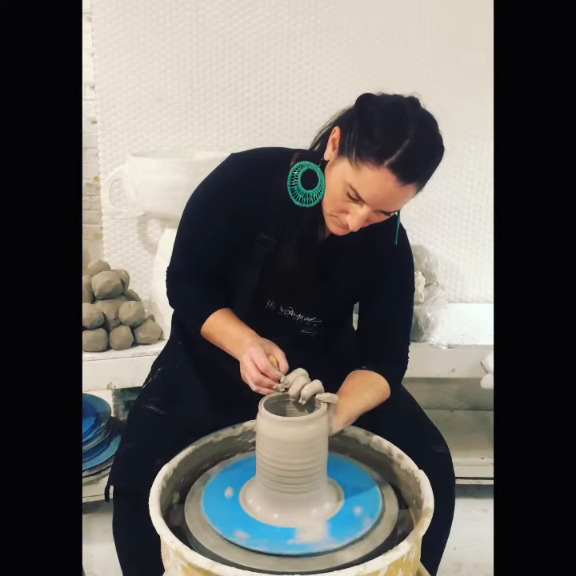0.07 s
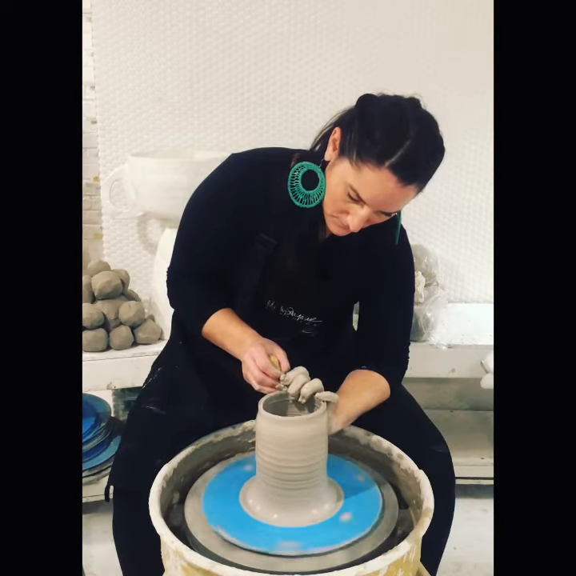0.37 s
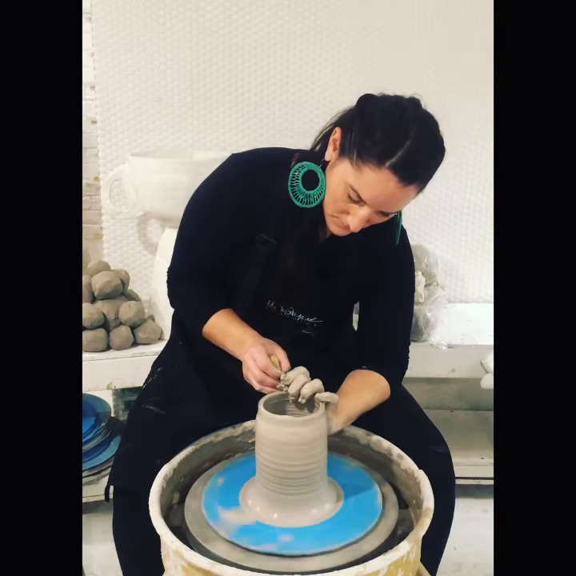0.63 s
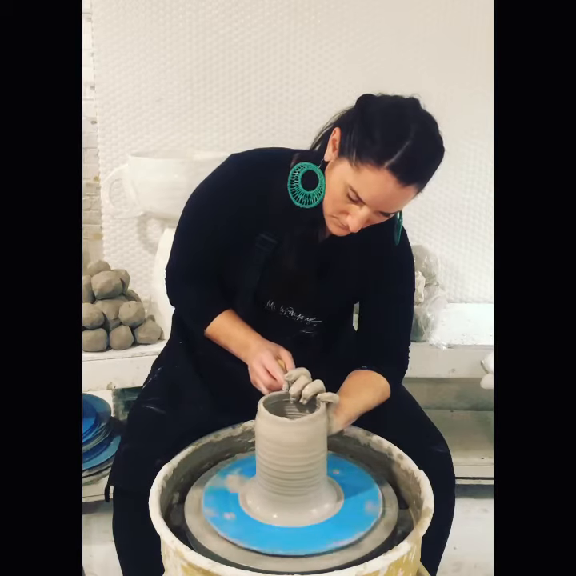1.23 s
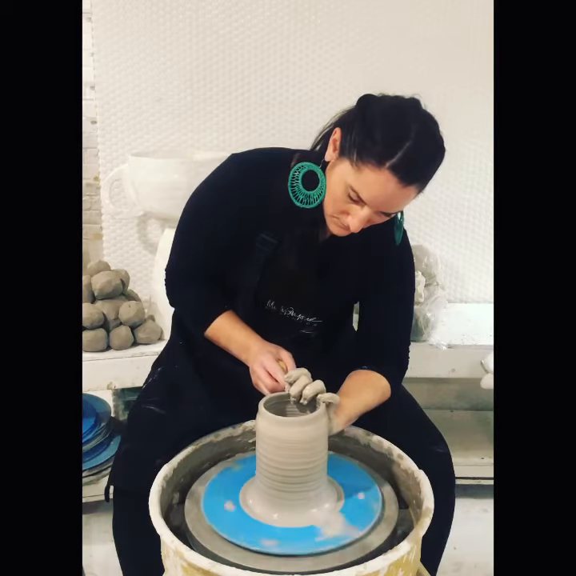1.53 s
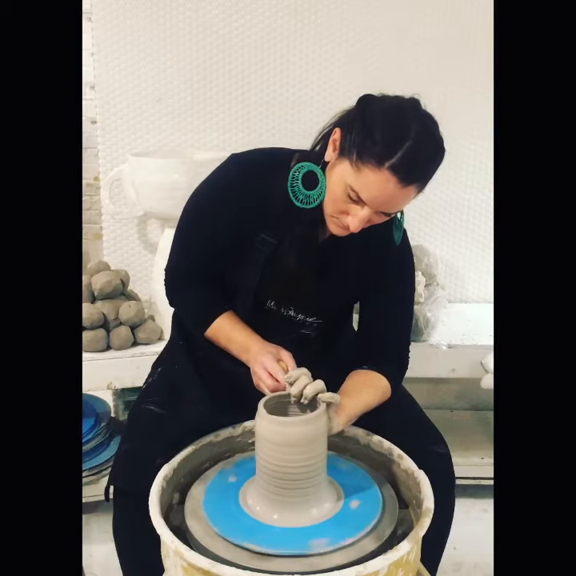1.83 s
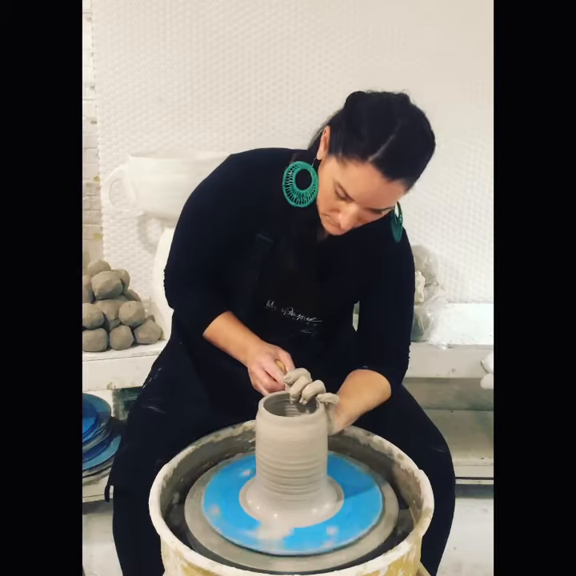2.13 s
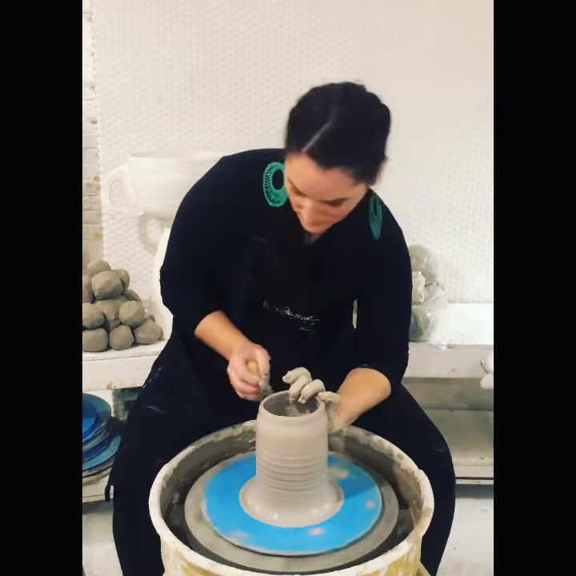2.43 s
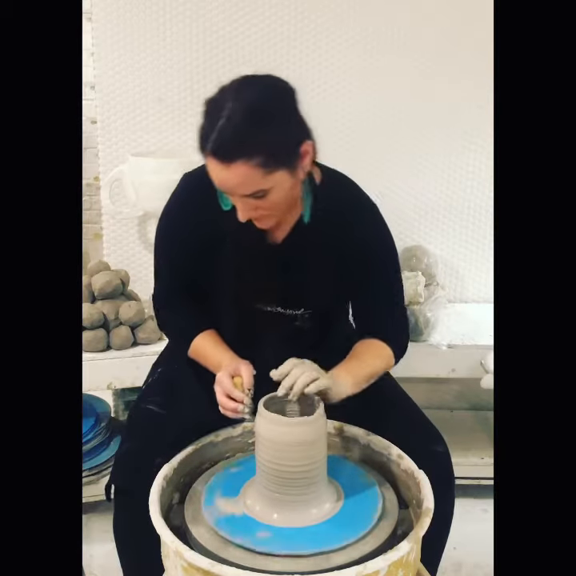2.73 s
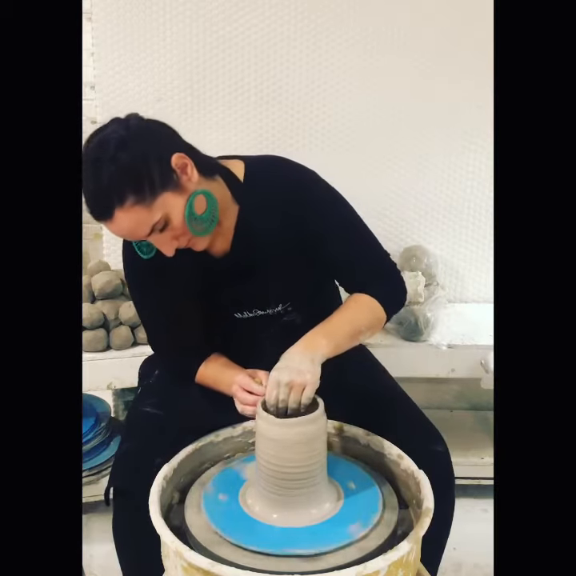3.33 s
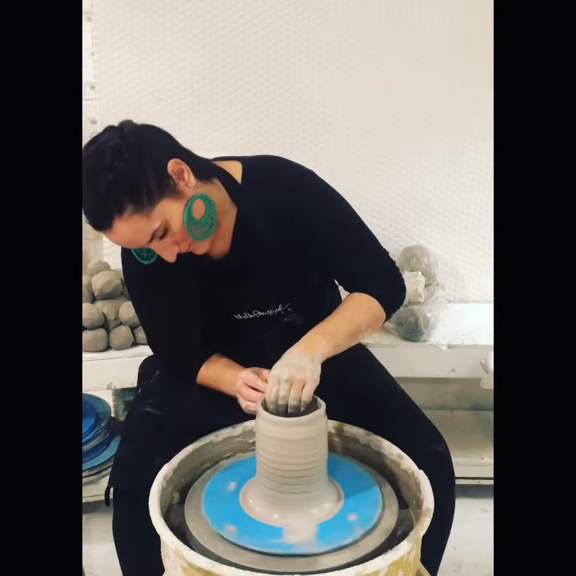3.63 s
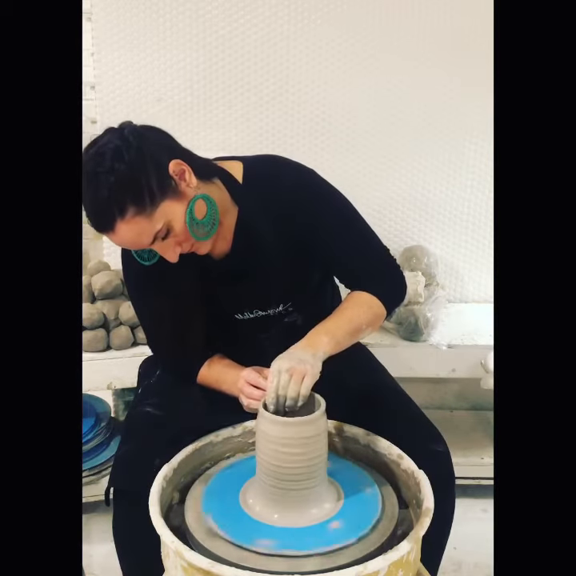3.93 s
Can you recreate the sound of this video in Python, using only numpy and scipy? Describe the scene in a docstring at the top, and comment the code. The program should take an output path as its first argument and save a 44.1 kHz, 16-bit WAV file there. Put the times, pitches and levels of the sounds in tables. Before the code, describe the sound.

An electric pottery wheel hums low and steady for the whole four seconds, with a soft rumble over quiet room hiss. Short, light rubs with a thin ring come irregularly, clearest near 0.1, from 1.5 to 2 and at 3.7 seconds. A faint dry tick sounds at about 0.2, 1.3, 2.3 and 3.4 seconds. Around 2.6 seconds, the motor's weaker tones dip slightly in pitch.

```python
"""Pottery wheel in a small studio

An electric wheel turns steadily while wet clay is shaped on it. Its motor hums at twice the mains
frequency, and its shaft adds weaker tones that sag as the load changes. Over a quiet hiss, the drive
rumbles, rubs now and then against a ringing housing and ticks once per turn of the wheel."""
import sys
import numpy as np
from scipy.fft import rfft, irfft, next_fast_len
from scipy.io import wavfile
from scipy.ndimage import map_coordinates

SR = 44100
rng = np.random.default_rng(int(sys.argv[2]) if len(sys.argv) > 2 else 0)


def to_wav(sig):
    """Store sig (one row per channel, or 1-D mono) as 16-bit WAV at the path in sys.argv[1].

    Samples outside -1..1 are clipped; the rate is SR.
    """
    pcm = np.clip(np.atleast_2d(sig), -1, 1) * 32767
    pcm = np.round(pcm).astype(np.int16)
    wavfile.write(sys.argv[1], SR, pcm.T)  # frames by channels


N = 176400


def amp(db):
    """Turn decibels into a number to multiply by."""
    return 10 ** (np.asarray(db) / 20)


def unit(x):
    """Scale x to an average (rms) level of 1."""
    return x / np.sqrt(np.mean(x ** 2) + 1e-20)


def curve(rows):
    """Join (time [s], value) points with straight lines, one value per sample."""
    return np.interp(np.arange(N) / SR, *np.transpose(rows))


def wobble(rate):
    """A smooth curve through `rate` random values a second."""
    return map_coordinates(rng.standard_normal(400), [np.arange(N) * rate / SR], mode="wrap")


def filtered(x, response):
    """Multiply each frequency in x by response(frequency)."""
    size = next_fast_len(N + SR // 2)
    return irfft(rfft(x, size) * response(np.fft.rfftfreq(size, 1 / SR)), size)[:N]


def coloured(x, points):
    """Shape x by (frequency [Hz], level [dB]) points, then scale it to level 1."""
    point_hz, db = np.transpose(points)
    return unit(filtered(x, lambda hz: amp(np.interp(np.log(hz + 1), np.log(point_hz + 1), db))))


def noise(points):
    """Random noise shaped by such points, at level 1."""
    return coloured(rng.standard_normal(N), points)


def tone(cycles, db):
    """A pure tone that follows a running count of cycles, at an average level of db."""
    return np.sqrt(2) * amp(db) * np.sin(2 * np.pi * (cycles + rng.random()))


def motor_hum(pitch_hz=119.96, gain_db=-2):
    """Magnetic pull shakes the motor at exact multiples of one pitch."""
    # tones of the hum (multiple of the pitch, relative level [dB])
    hum_tones = [(.5, -73), (1, -48), (2, -39.5), (3, -49.5), (4, -52), (5, -64), (6, -81.5), (7, -77.5),
                 (8, -63), (9, -72), (10, -73.5), (12, -83.5), (13, -78.5), (14, -87), (15, -84.5),
                 (16, -83.5), (17, -78), (18, -86.5), (19, -94), (20, -96), (21, -96)]
    cycles = pitch_hz * np.arange(N) / SR
    hum = np.zeros(N)
    for multiple, db in hum_tones:
        waver_db = np.interp(multiple, [2, 10], [0.76, 0.2])  # low tones waver more
        hum += tone(multiple * cycles, gain_db + db + waver_db * wobble(rate=6.91))
    return hum


def motor_shaft(rotor_slots=16, waver_db=1.5):
    """The shaft's tones follow its speed, sliding on or off the pitches at which the frame rings."""
    # pitch made by the slots in the motor's spinning core (time [s], frequency [Hz])
    slot_pitch = [(0, 415.5), (.4, 418.2), (2.5, 418.3), (2.8, 404.8), (4, 405.4)]
    # shaft tones (multiple of the shaft speed, level [dB], change as the shaft slows [dB per Hz])
    shaft_tones = [(3.028, -71.5, -2.5), (3.976, -68.5, -2), (5.017, -63, -1), (6.014, -60.5, 7.5),
                   (8.013, -56, -8.5), (11.76, -88.5, 17), (14, -93.5, 4), (16, -57.5, 1.5),
                   (24.01, -78, 3)]
    shaft_hz = curve(slot_pitch) / rotor_slots
    turns = np.cumsum(shaft_hz) / SR
    sag_hz = shaft_hz.max() - shaft_hz
    return sum(tone(multiple * turns, db + slope * sag_hz + waver_db * wobble(rate=5.76))
               for multiple, db, slope in shaft_tones)


def drive_rumble(level_db=-54, waver_db=0.14):
    """Belt and bearings shake the frame, which drones near one pitch, swelling and fading."""
    # tone colour of the rumble (frequency [Hz], relative level [dB])
    rumble_colour = [(20, -34), (35, -28), (55, -16), (80, -11), (108, -1), (135, 0.5), (160, 5.5),
                     (180, -0.5), (195, -10.5), (245, -3), (270, -8.5), (300, -10), (350, 1), (385, -3.5),
                     (430, -10.5), (520, -16.5), (700, -19.5), (1000, -28), (1600, -57.5), (5000, -120)]
    # tone colour of the frame's drone (frequency [Hz], relative level [dB])
    drone_colour = [(150, -120), (275, -35), (305, -4), (321, 7.5), (336, -8.5), (375, -34.5), (700, -120)]
    # loudness of the drone (time [s], level [dB])
    drone_level = [(0, -57.5), (.4, -63), (.6, -55.5), (1.0, -59), (1.27, -57), (1.45, -62.5), (1.8, -55.5),
                   (2.1, -63), (2.45, -66), (2.76, -56), (3.25, -59), (3.63, -52.5), (4, -60)]
    rumble = amp(level_db + waver_db * wobble(rate=5.5)) * noise(rumble_colour)
    drone = amp(curve(drone_level)) * noise(drone_colour)
    return rumble + drone


def room_hiss(level_db=-72.5):
    """A quiet, even hiss fills the room."""
    # tone colour of the hiss (frequency [Hz], relative level [dB])
    hiss_colour = [(20, -8), (500, 2), (1500, 3), (2100, 4), (2700, 0), (3700, -0.2), (5000, -2.5),
                   (7000, -5.5), (10000, -8.5), (11500, -11.5)]
    return amp(level_db) * noise(hiss_colour)


def housing_ring(hz):
    """How the housing answers a push at each frequency: it rings at a few pitches of its own."""
    # the housing's ringing pitches (frequency [Hz], width [Hz], relative level [dB])
    rings = [(667, 29, -10.5), (807.4, 27, -8.5), (856, 22, -3), (927, 16, -3.5), (1000, 22, -1),
             (1146, 14, -5.5), (1220, 9.5, -4.5), (1396, 42, -8.5)]
    return sum((-1) ** k * amp(db) * 1j * hz * width / (centre ** 2 - hz ** 2 + 1j * hz * width)
               for k, (centre, width, db) in enumerate(rings))


def rubbing(between_rubs_db=-67, catches_per_s=500, sing_hz=1013.5):
    """Friction with tiny catches rings the housing; in each rub it swells and the strongest ring sings."""
    # rubs on the housing (middle [s], length [s], friction level [dB], singing level [dB])
    rubs = [(0.095, 0.078, -62.5, -58), (0.177, 0.064, -67, -64.5), (0.83, 0.1, -71, -68),
            (1.07, .05, -67, -64), (1.278, .04, -61.5, -65), (1.54, 0.11, -62.5, -59.5),
            (1.754, .14, -59, -61), (1.952, 0.098, -61, -60.5), (2.344, .12, -63, -67),
            (2.55, 0.083, -66, -72), (2.71, 0.034, -63, -62), (2.79, 0.046, -69, -68),
            (2.97, .08, -68.5, -71), (3.63, .08, -77, -61), (3.709, 0.054, -56.5, -58),
            (3.795, 0.039, -69, -60), (3.96, 0.081, -73, -63)]
    # tone colour laid over the friction (frequency [Hz], relative level [dB])
    friction_colour = [(400, -13), (650, -3.5), (1000, -0.5), (1420, -2), (1550, 0), (2500, -23),
                       (5000, -43)]
    t = np.arange(N) / SR
    swells = np.array([np.exp(-(2 * (t - middle) / length) ** 2) for middle, length, _, _ in rubs])
    _, _, friction_db, sing_db = np.transpose(rubs)
    catches = unit((rng.random(N) < catches_per_s / SR) * rng.standard_normal(N))
    sliding = 0.7 * rng.standard_normal(N)
    friction = coloured(filtered(catches + sliding, housing_ring), friction_colour)
    friction_gain = np.hypot(amp(between_rubs_db), amp(friction_db) @ swells)
    flutter_cycles = 0.051 * wobble(rate=70)
    flutter_db = -0.8 * wobble(rate=48)
    singing = tone(sing_hz * t + flutter_cycles, flutter_db)
    return friction_gain * friction + (amp(sing_db) @ swells) * singing


def wheel_ticks(attack_s=0.0006):
    """A faint dry tick comes round with every turn of the wheel."""
    # the ticks (time [s], relative level [dB])
    ticks = [(0.2268, -58.5), (1.277, -59.5), (2.3277, -59.3), (3.378, -58.3)]
    # tones in a tick (frequency [Hz], relative level [dB], time to fade by 60 dB [s])
    tick_tones = [(3000, 4, .004), (3500, 3, .0035)]
    sound = np.zeros(N)
    for start, tick_db in ticks:
        age = np.clip(np.arange(N) / SR - start, 0, 0.05)
        rise = 1 - np.exp(-age / attack_s)
        ring = sum(amp(db - 60 * age / fade_s) * np.sin(2 * np.pi * hz * age)
                   for hz, db, fade_s in tick_tones)
        sound += amp(tick_db) * rise * ring
    return sound


def scene():
    """Add the wheel and the room together in one channel."""
    return (motor_hum() + motor_shaft() + drive_rumble() + room_hiss() + rubbing() + wheel_ticks())[None]


def record(dry):
    """Cut away the highest treble."""
    return filtered(dry[0], lambda hz: hz < 11700)[None]


dry = scene()
out = record(dry)
to_wav(out)
```